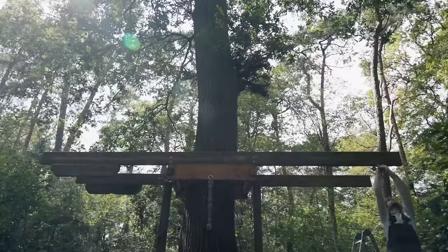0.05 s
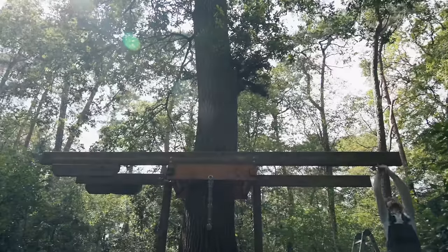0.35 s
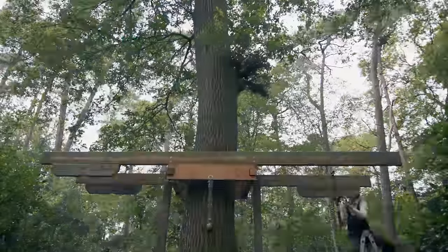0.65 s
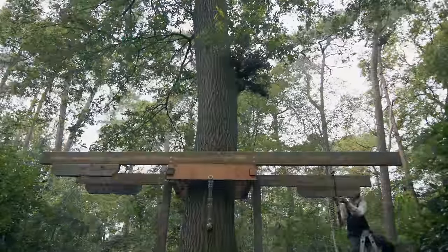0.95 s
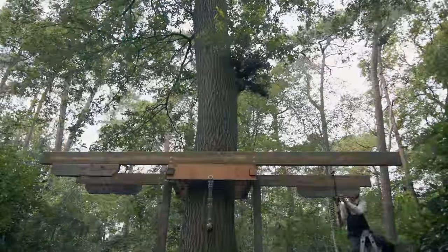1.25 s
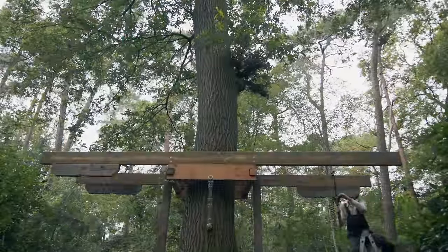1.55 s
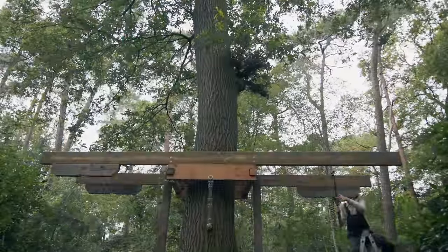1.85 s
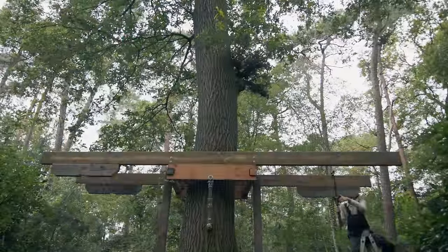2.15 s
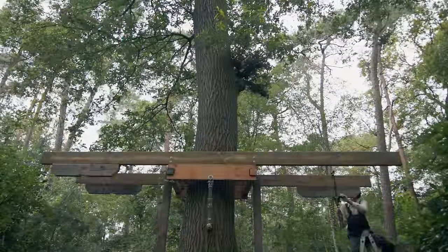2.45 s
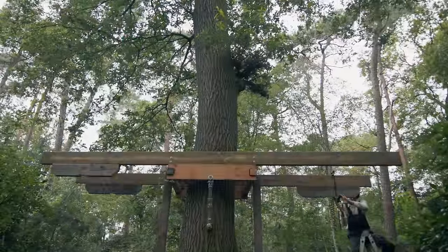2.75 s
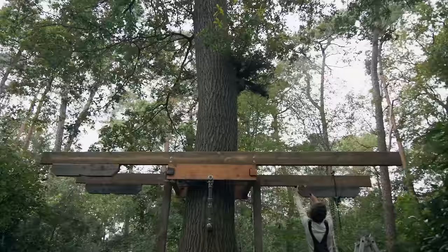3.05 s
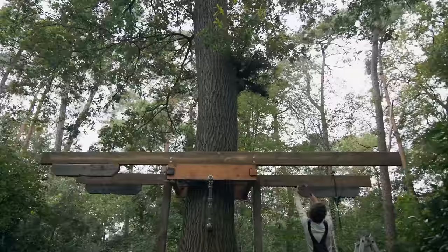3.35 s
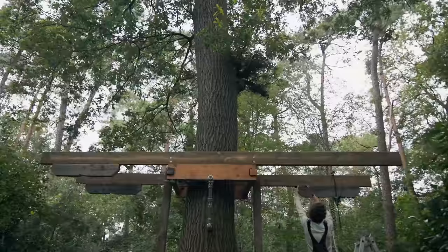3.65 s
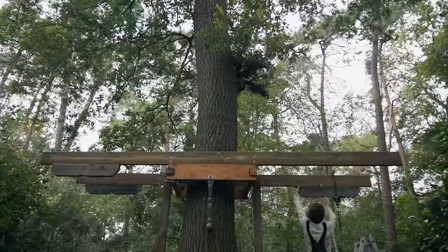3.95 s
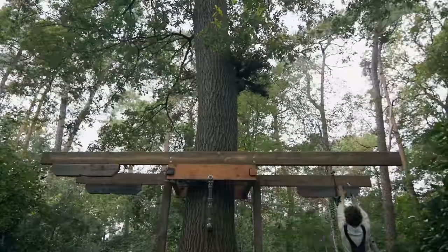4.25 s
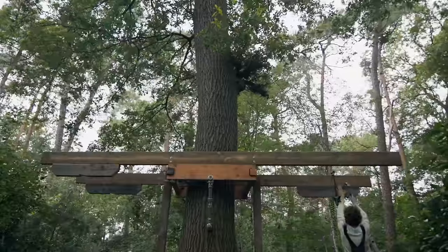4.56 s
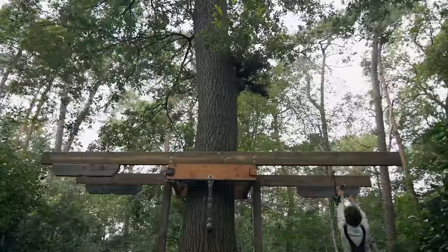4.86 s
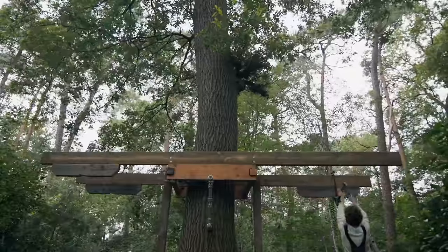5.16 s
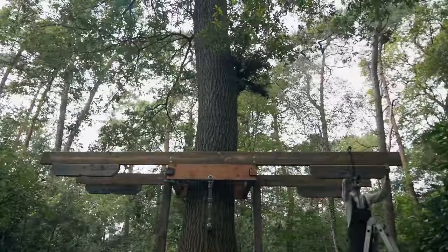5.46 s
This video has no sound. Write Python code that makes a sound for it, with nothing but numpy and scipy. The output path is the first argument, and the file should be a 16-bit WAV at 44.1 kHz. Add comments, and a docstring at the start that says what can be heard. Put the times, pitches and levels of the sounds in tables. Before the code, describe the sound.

A steady distant rush and soft leaf hiss fill a forest, with a few faint ticks of timber work. Two sharp, light knocks on wood come about a second apart. Three heavy blows on a wooden beam follow, the last two close together, each ringing briefly, overloading the microphone and fluttering between the trunks. After the first blow the background briefly hushes while a breeze bumps the microphone.

```python
"""A distant rush and leaf hiss fill a wood, with a few faint ticks from timber work on a tree platform.
Two sharp, light knocks follow, then three heavy blows on a beam that overload the microphone.
The beam rings briefly; the forest scatters each hit into a long tail, and the blows flutter between
the big trunks. After the first blow the background hushes while a breeze bumps the microphone ports."""
import sys
import numpy as np
from scipy import signal
from scipy.fft import rfft, irfft, next_fast_len
from scipy.io import wavfile
from scipy.ndimage import map_coordinates

SR = 44100
rng = np.random.default_rng(int(sys.argv[2]) if len(sys.argv) > 2 else 0)


def to_wav(s):
    """Save 16-bit WAV."""
    ch = np.atleast_2d(s).T  # columns
    pcm = np.round(np.clip(ch, -1, 1) * 32767)  # PCM
    wavfile.write(sys.argv[1], SR, pcm.astype(np.int16))


N = 246519

# stereo image of the direct sound: f/Hz, left-right likeness (1 = mono)
DIRECT_LIKENESS = [(300, 0.92), (1500, 0.73), (5000, 0.74), (15000, 0.2)]
# stereo image of the echoes: f/Hz, left-right likeness
ECHO_LIKENESS = [(150, 1), (700, 0.71), (2500, 0.96), (7000, 0.62), (15000, 0.18)]


def amp(db):
    """Decibels to gain."""
    return 10 ** (np.asarray(db) / 20)


def unit(x):
    """Scale to rms 1."""
    return x / np.sqrt(np.mean(x ** 2) + 1e-20)


def along(points, hz):
    """Read (f/Hz, value) points on a log frequency axis."""
    freqs, values = np.transpose(points)
    return np.interp(np.log(hz + 1), np.log(freqs + 1), values)


def automation(points):
    """Join (t/s, value) points into one value per sample."""
    times, values = np.transpose(points)
    return np.interp(np.arange(N) / SR, times, values)


def wobble(rate):
    """A smooth random curve, rate knots a second."""
    return map_coordinates(rng.standard_normal(N // 100), [np.arange(N) * rate / SR])


def filtered(x, response):
    """Equalise x with a gain that is a function of frequency."""
    size = x.shape[-1]
    padded = next_fast_len(size + 8192)
    return irfft(rfft(x, padded) * response(np.fft.rfftfreq(padded, 1 / SR)), padded)[..., :size]


def noise(spectrum, likeness, size, tilt_db=0):
    """Coloured stereo noise of rms 1, tilted by tilt_db an octave."""
    def mid_side_gains(hz):
        width = np.arccos(np.clip(along(likeness, hz), -1, 1)) / 2
        colour = amp(along(spectrum, hz) + tilt_db * np.log2(hz + 1))
        return colour * [np.cos(width), np.sin(width)]
    mid, side = filtered(rng.standard_normal((2, size)), mid_side_gains)
    return unit(np.array([mid + side, mid - side]))


def attack(t, rise_s):
    """A rounded onset with time constant rise_s."""
    return 1 - np.exp(-t / rise_s)


def fade(t, t60):
    """Exponential decay, 60 dB down after t60."""
    return np.exp(-np.log(1000) * t / t60)


def damped(x, t60s):
    """Let each frequency of x die at its own speed."""
    hz, t, bands = signal.stft(x, SR, nperseg=128)
    _, decayed = signal.istft(bands * fade(t, along(t60s, hz)[:, None]), SR)
    return decayed[:, :x.shape[1]]


def ring(modes, t, place, scatter_db):
    """Damped modes; the place of the hit sets their strengths, with a little chance."""
    out = np.zeros(len(t))
    for hz, near_db, far_db, t60 in modes:
        db = near_db + place * (far_db - near_db) + scatter_db * rng.standard_normal()
        out += amp(db) * fade(t, t60) * np.cos(2 * np.pi * hz * t)
    return out


def pan(left_db):
    """Left and right gains, left_db apart."""
    return amp([[left_db / 2], [-left_db / 2]])


def add(track, start, sound):
    """Mix a sound into the track at start seconds."""
    part = track[:, round(start * SR):][:, :sound.shape[-1]]
    part += sound[..., :part.shape[1]]


def background():
    """A far, wavering rush and leaves overhead swell and hush together; a low drone slowly recedes."""
    # strength of the rush and the hiss: t/s, level/dB
    strength = [(0, -57.5), (0.9, -57), (2.95, -56), (3.04, -53), (3.47, -52.4), (3.57, -64), (4.2, -63),
                (4.42, -57), (5.17, -56.4), (5.3, -54), (5.5, -56.5), (5.56, -49.5)]
    # noise spectra of the three layers: f/Hz, level/dB
    rush_colour = [(40, -39), (110, -2.5), (300, -1), (650, -2.5), (1100, -7.5), (1600, -15), (2500, -22),
                   (6000, -33.5)]
    leaf_colour = [(500, -14), (1500, 1.5), (2800, 0), (5000, -1), (8000, -0.5), (11000, -6.5),
                   (15500, -19)]
    drone_colour = [(20, -34.5), (44, -6.5), (54, -0.5), (64, 3), (72, -13.5), (120, -12.5), (300, -56)]
    # stereo image of the rush and the hiss: f/Hz, left-right likeness
    likeness = [(60, 1), (290, 0.29), (640, 0.53), (1400, 0.62), (3100, 0.62), (6800, 0.39), (15000, 0)]
    strength_db = automation(strength)
    swell_db = strength_db - np.median(strength_db)
    rush_db = -41.5 + 1.004 * swell_db + 0.6 * wobble(rate=7)
    drone_db = -41.5 - 1.37 * np.arange(N) / SR
    rush = amp(rush_db) * noise(rush_colour, likeness, N)
    leaves = amp(-53 + swell_db) * noise(leaf_colour, likeness, N)
    drone = amp(drone_db) * noise(drone_colour, likeness=[(60, 0.56)], size=N)
    return rush + leaves + drone


def breeze():
    """Moving air buffets each microphone port on its own; single eddies give soft bumps."""
    # strength of the breeze on the ports: t/s, level/dB
    strength = [(0.0, -47.5), (2.97, -46), (3.11, -32), (3.27, -42.5), (3.6, -27), (3.77, -57),
                (3.85, -38.5), (4.19, -37.5), (4.27, -58.5), (4.45, -37.5), (5.43, -39), (5.59, -67)]
    # spectrum of the buffeting: f/Hz, level/dB
    buffet_colour = [(15, -8), (32, -3.5), (55, -17.5), (90, -14.5), (180, -57), (500, -127)]
    # eddies that hit the ports: t/s, level/dB, left over right/dB
    eddies = [(.255, -18, 0), (3.536, -11.5, 0), (3.611, -10, 6), (3.862, -20, 21), (3.956, -14.5, 14.5),
              (4.09, -20, 22), (4.175, -19, 9)]
    out = amp(automation(strength) + 3) * noise(buffet_colour, likeness=[(40, 0.11)], size=N)
    t, bump_hz = np.arange(SR // 4) / SR, 32.4
    bump = attack(t, rise_s=0.0055) * fade(t, t60=0.072) * np.cos(2 * np.pi * bump_hz * t)
    for start, db, left_db in eddies:
        add(out, start, amp(db) * pan(left_db) * bump)
    return out


def ticks():
    """Tiny contacts of wood and metal, each a short noise burst around one pitch."""
    # small contacts: t/s, level/dB, centre f/Hz, width/octaves
    contacts = [(0.3816, -43, 2400, 2.2), (0.547, -46, 1900, 1.2), (0.646, -45, 2100, 3.2),
                (3.1385, -16, 8700, 0.28), (3.15, -18.5, 5970, 1.1), (3.184, -25, 1100, 0.43),
                (4.469, -35, 8400, .4), (4.9405, -27, 8540, 0.25)]
    decay_cycles = 134  # high ticks die sooner
    out, t = np.zeros((2, N)), np.arange(SR // 10) / SR
    for start, db, centre_hz, octaves in contacts:
        band = lambda hz: 1 / (1 + (np.log2((hz + 1) / centre_hz) / octaves) ** 2) ** 2
        burst = unit(filtered(rng.standard_normal(len(t)), band))
        add(out, start, amp(db) * fade(t, decay_cycles / centre_hz) * burst)
    return out


def knocks():
    """Light, hard contacts: a bright crack, its spray off the nearby timbers and a thin wooden ring."""
    # light hits: t/s, level/dB, place (0-1), brightness/(dB per octave), left over right/dB
    hits = [(1.2757, -21.5, 0.03, -3, -2.5), (2.4479, -18, 0.99, 0.9, -2.5)]
    # modes of the struck wood: f/Hz, level at place 0/dB, level at place 1/dB, t60/s
    wood_modes = [(219.2, -26, -11.5, 0.59), (320.6, -10.5, -9, 0.22), (380, -23, -16.5, 0.4),
                  (441, -18, -23, 0.38), (699, -30, -16.5, 0.27), (868, -9.5, -21, 0.071),
                  (1655, -10, -4.5, 0.068), (1996, -12, -11.5, 0.077), (3050, -26, -5.5, 0.035),
                  (3560, -34, -4, 0.036), (4810, -6.5, -32, 0.065), (7240, -1, -4, 0.041)]
    # spectrum of the crack and its spray: f/Hz, level/dB
    crack_colour = [(100, -10.5), (600, -2), (1800, -2), (2700, -2), (5200, -1.5), (7400, 2.5), (11000, -1),
                    (15500, -12.5)]
    out, t = np.zeros((2, N)), np.arange(SR // 2) / SR
    for start, db, place, tilt_db, left_db in hits:
        crack = amp(5) * fade(t, t60=0.031) * noise(crack_colour, DIRECT_LIKENESS, len(t), tilt_db)
        spray = amp(-8.5) * fade(t, t60=0.18) * noise(crack_colour, ECHO_LIKENESS, len(t), tilt_db)
        wood = ring(wood_modes, t, place, scatter_db=3)
        add(out, start, amp(db) * pan(left_db) * attack(t, rise_s=0.00062) * (crack + spray + wood))
    return out


def high_passed(x, corner_hz):
    """A high-pass thins out the deep end of the hits."""
    return signal.sosfilt(signal.butter(2, corner_hz, "high", fs=SR, output="sos"), x)


def forest_tail(x):
    """Trunks return a ragged cloud of echoes, which builds up as sound reaches them."""
    # scatter from the trunks, with the soft ground's dip near 400 Hz: f/Hz, level/dB
    scatter_colour = [(100, 1.5), (170, 1), (320, -4), (450, -11), (720, -4), (950, -7), (1250, -9),
                      (3200, -9.5), (6000, 0), (14000, -0.5)]
    # decay of the scatter: f/Hz, t60/s
    scatter_decay = [(150, 0.32), (350, 0.57), (750, 0.94), (1500, 0.9), (4000, 0.57), (10000, 0.31)]
    t = np.arange(SR * 3 // 2) / SR
    cloud = damped(noise(scatter_colour, ECHO_LIKENESS, len(t)), scatter_decay)
    ragged = amp(1.8 * wobble(rate=65.5)[:len(t)])
    tail = cloud * attack(t, rise_s=0.014) * ragged
    return signal.fftconvolve(x, tail / np.linalg.norm(tail[0]), axes=1)[:, :N]


def beam_blows():
    """Each heavy blow rings the beam's clear modes and a splintery wash of dense ones."""
    # heavy hits: t/s, level/dB, place (0 near the trunk, 1 free end), splinter level/dB
    hits = [(3.1365, -3.4, 0.077, -5), (4.4198, -0.3, 0.93, -4), (4.8839, 1, 0.95, -4)]
    # clear modes: f/Hz, level struck near the trunk/dB, level struck at the free end/dB, t60/s
    beam_modes = [(132.7, -23, -20, 0.33), (164.5, -21, -35.5, 1), (189.4, -26, -45, 1),
                  (310, -5, -56, 0.14), (330.5, 1.5, -7, 0.13), (416, -6, 0.5, 0.088),
                  (470, -10, -10.5, 0.15), (539, -4, -20, 0.044), (610, -28, -22.5, 0.38),
                  (702.6, -23, -5.5, 0.097), (763.3, -8.5, -0.5, 0.061), (802, -7, -6.5, 0.045),
                  (888, -10.5, -20, 0.095), (1087, -13, -59, 0.19), (1149, -1.5, -10, 0.051),
                  (1205, -7, 1, 0.062), (1406, -10, -24, 0.045), (1561, -19, -16.5, 0.1),
                  (1620, -29, -33, 0.064), (1872, -12, -57, 0.036), (1895, -8.5, -42, 0.057),
                  (2210, -8, -13, 0.034), (2757, -5, -30, 0.032), (3330, -17.5, -11, 0.045),
                  (4390, -16.5, -29, 0.037)]
    # spectrum of the dense modes: f/Hz, level/dB
    splinter_colour = [(40, -38), (170, -22.5), (400, 8), (1000, -3), (2300, -8), (3300, -8.5), (5000, -20),
                       (9000, -19.5), (15000, -27.5)]
    # their decay: f/Hz, t60/s
    splinter_decay = [(200, 0.19), (1000, 0.11), (3000, 0.078), (9000, 0.087)]
    out, t = np.zeros((2, N)), np.arange(SR // 2) / SR
    contact = attack(t, rise_s=0.0003)  # the wood gives a little under the blow
    for start, db, place, splinter_db in hits:
        splinter = damped(noise(splinter_colour, DIRECT_LIKENESS, len(t)), splinter_decay)
        body = ring(beam_modes, t, place, scatter_db=2)
        add(out, start, amp(db) * contact * (body + amp(splinter_db) * splinter))
    return out * pan(left_db=-1.5)


def flutter_echo(x):
    """The beam's middle notes bounce between the big trunks, weaker each trip, swaying left and right."""
    # tone of the trunks' reflection: f/Hz, level/dB
    trunk_colour = [(200, -52), (450, -26.5), (630, -13.5), (750, -8), (860, -13), (1000, -22),
                    (1230, -24.5), (1500, -25), (6000, -34)]
    trips, trip_s, uneven_s = 10, 0.0496, 0.002
    send_db, trip_loss_db, sway_db = -7.5, 1.65, 1.5
    out = np.zeros((2, N))
    reflection = filtered(x, lambda hz: amp(along(trunk_colour, hz)))
    for trip, early in enumerate(rng.uniform(-1.057, 1, trips)):
        delay = (trip + 1) * trip_s - early * uneven_s
        add(out, delay, amp(send_db - trip_loss_db * trip) * pan(sway_db * (-1) ** trip) * reflection)
    return out


def scene():
    """The timber work and its echoes over the bed of the wood."""
    heavy = high_passed(beam_blows(), corner_hz=109)
    light = high_passed(knocks(), corner_hz=148)
    echoes = amp(-12.5) * forest_tail(heavy) + flutter_echo(heavy) + amp(-14) * forest_tail(light)
    return heavy + light + echoes + ticks() + background() + breeze()


def record(dry):
    """The microphone overloads on the heavy blows; a steep low-pass takes off the very top."""
    ceiling, hardness, top_hz = 0.93, 5, 15850
    clipped = dry / (1 + np.abs(dry / ceiling) ** hardness) ** (1 / hardness)
    return filtered(clipped, lambda hz: 1 / np.sqrt(1 + (hz / top_hz) ** 160))


dry = scene()
out = record(dry)
to_wav(out)
```